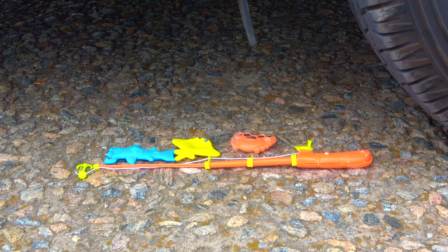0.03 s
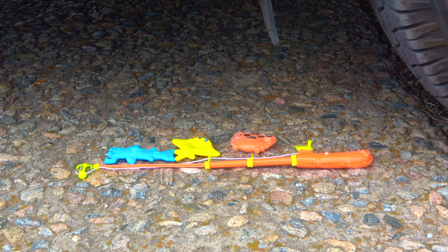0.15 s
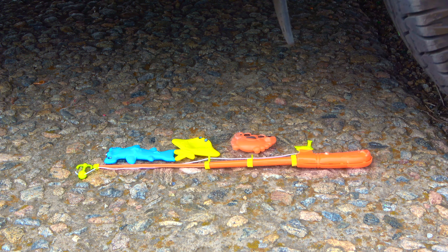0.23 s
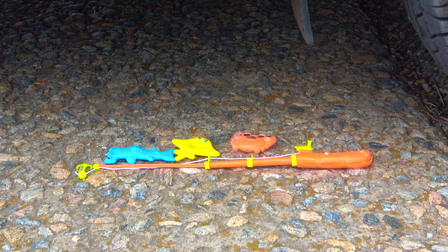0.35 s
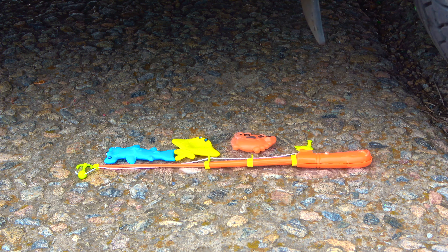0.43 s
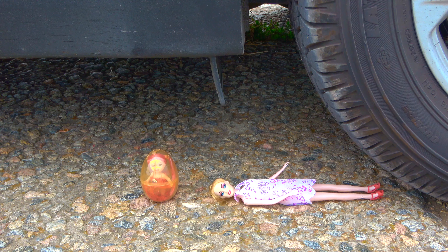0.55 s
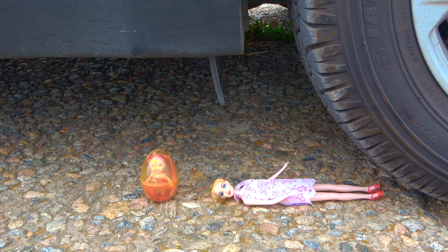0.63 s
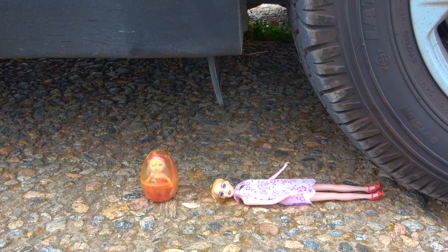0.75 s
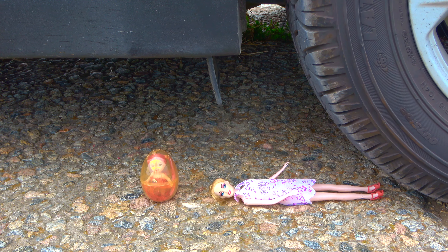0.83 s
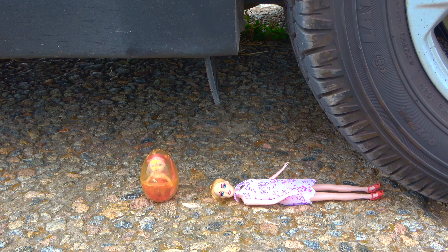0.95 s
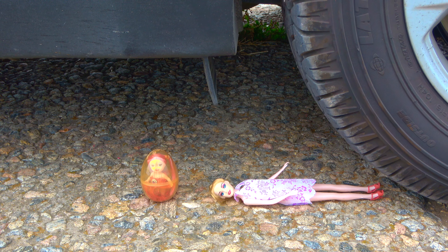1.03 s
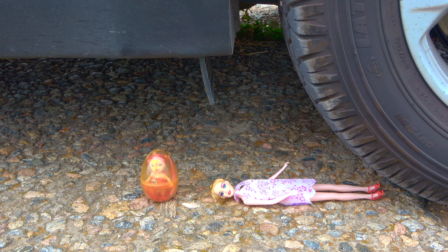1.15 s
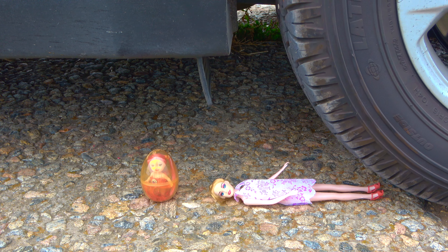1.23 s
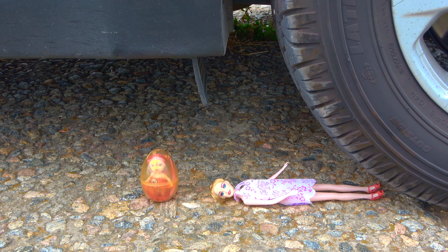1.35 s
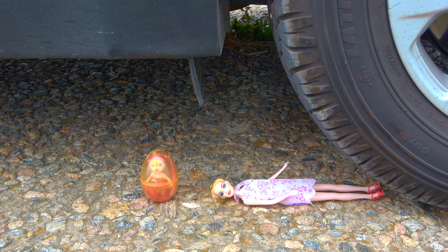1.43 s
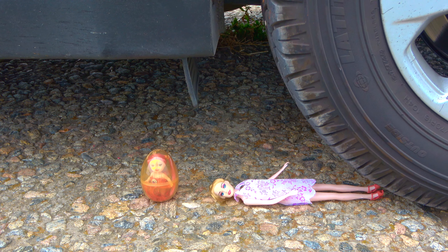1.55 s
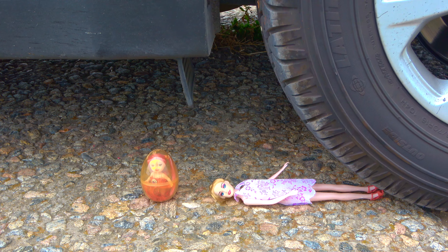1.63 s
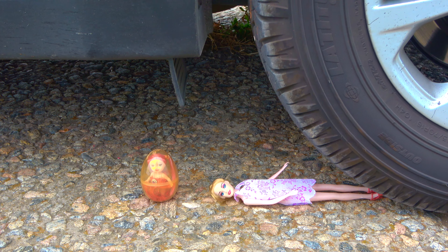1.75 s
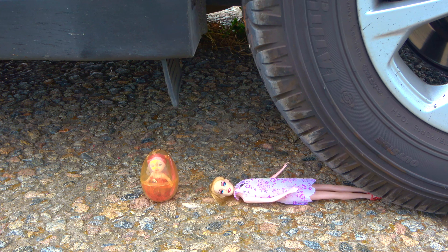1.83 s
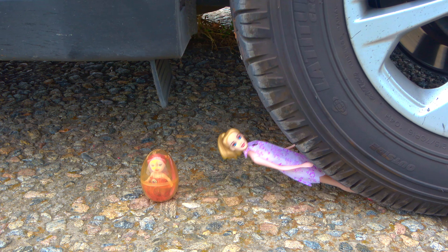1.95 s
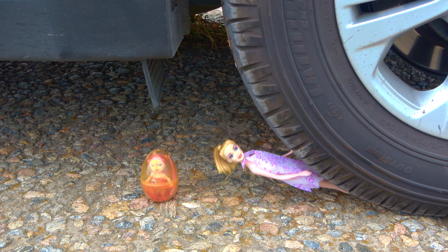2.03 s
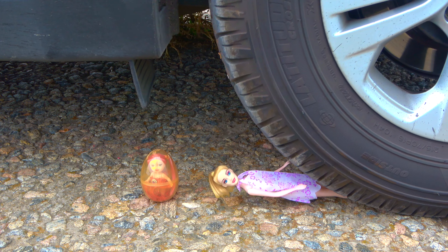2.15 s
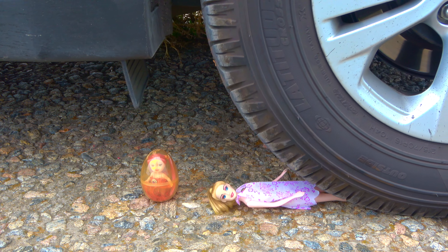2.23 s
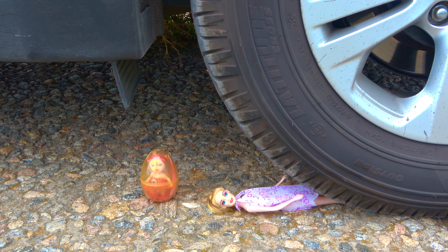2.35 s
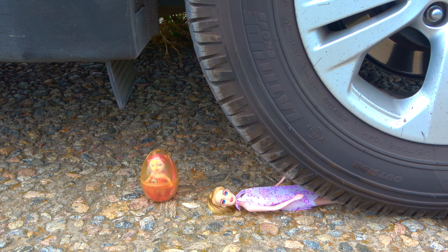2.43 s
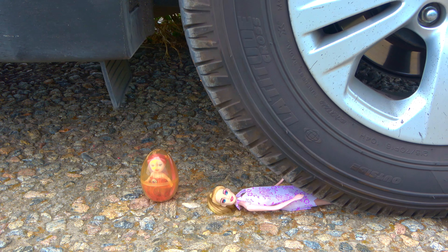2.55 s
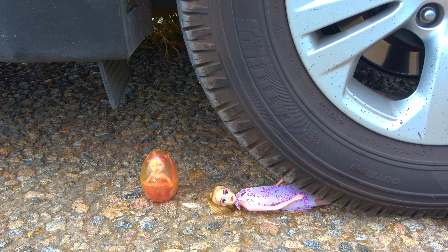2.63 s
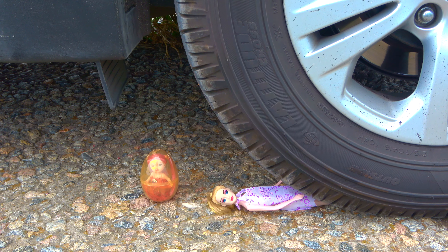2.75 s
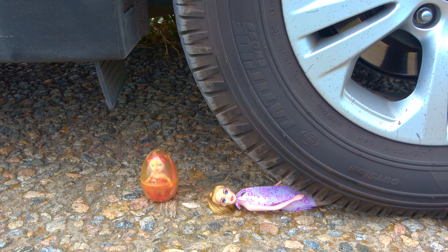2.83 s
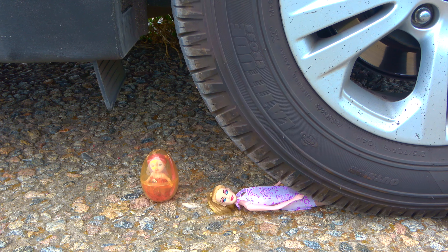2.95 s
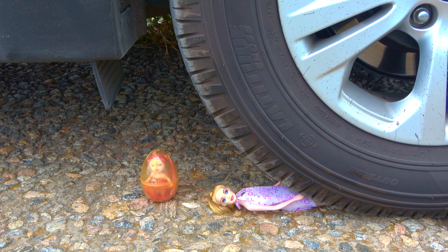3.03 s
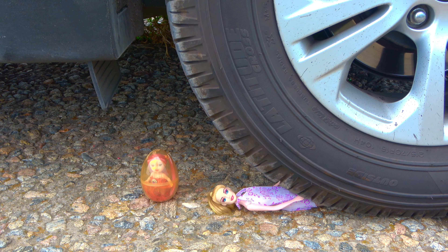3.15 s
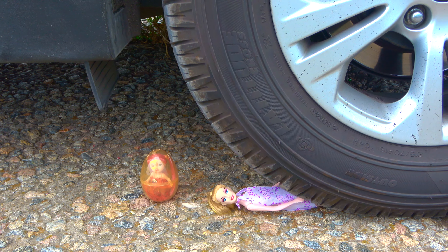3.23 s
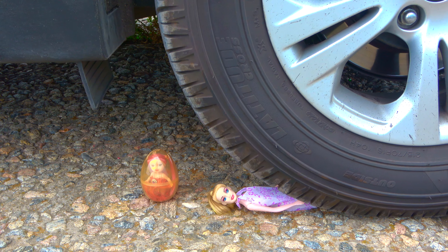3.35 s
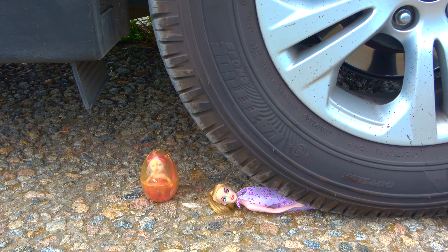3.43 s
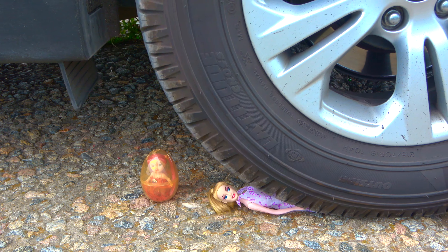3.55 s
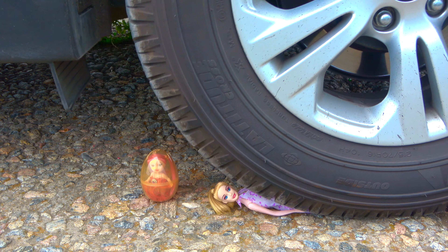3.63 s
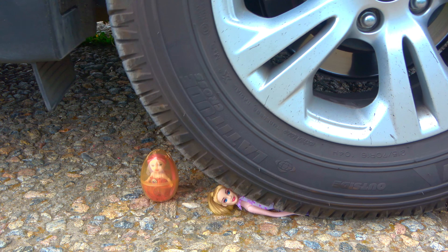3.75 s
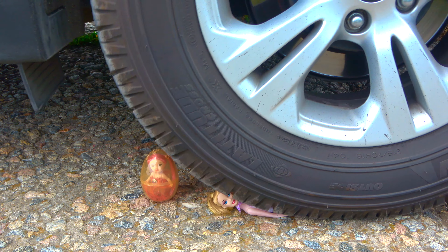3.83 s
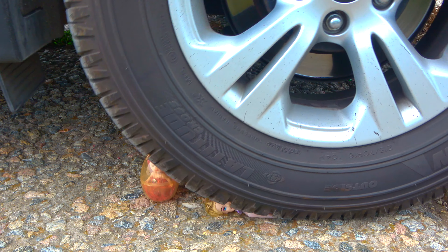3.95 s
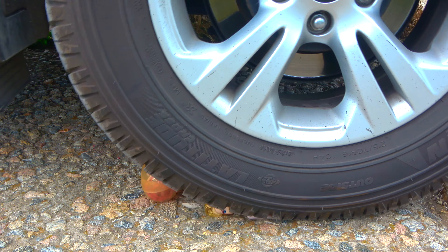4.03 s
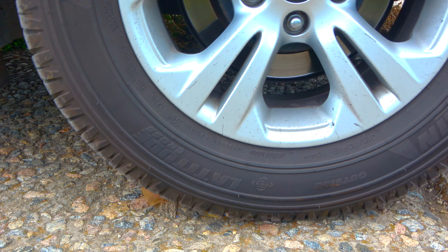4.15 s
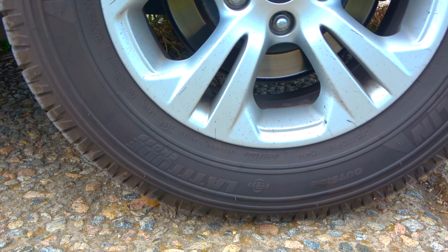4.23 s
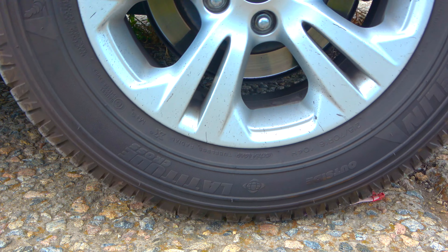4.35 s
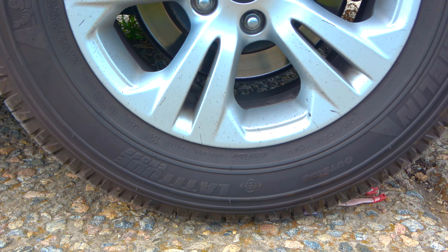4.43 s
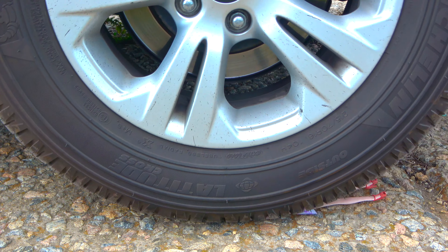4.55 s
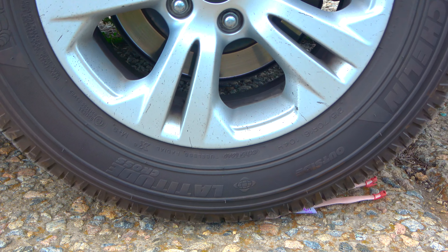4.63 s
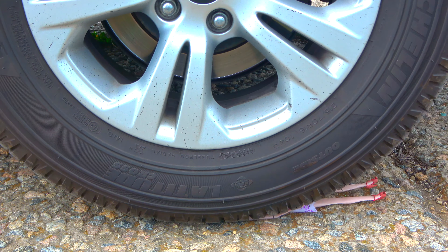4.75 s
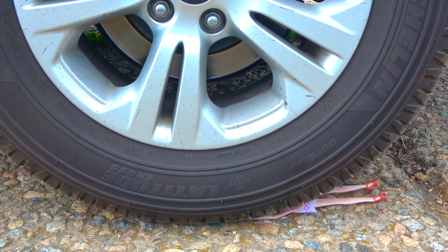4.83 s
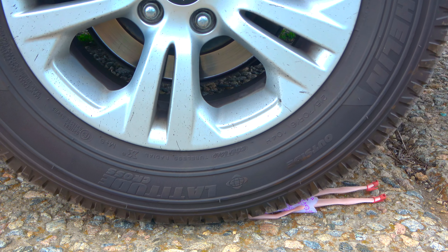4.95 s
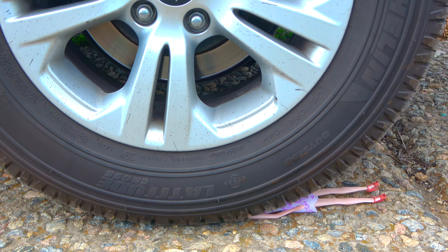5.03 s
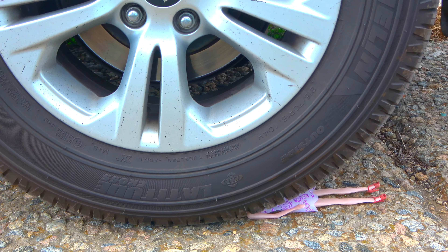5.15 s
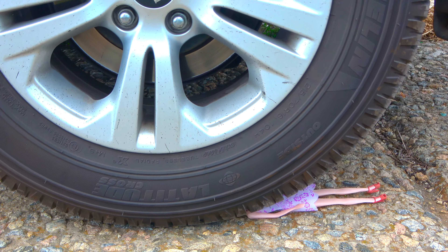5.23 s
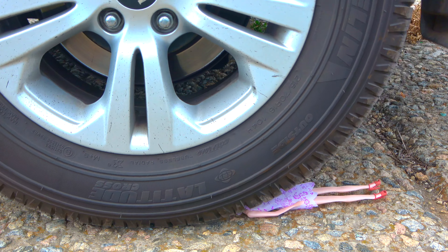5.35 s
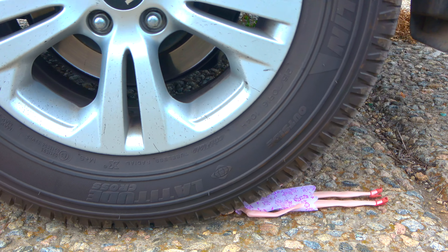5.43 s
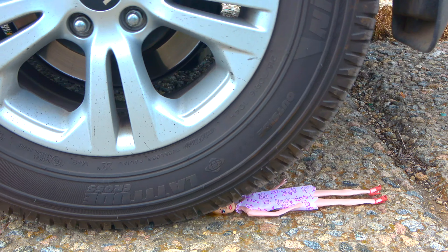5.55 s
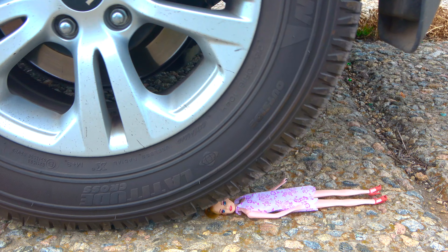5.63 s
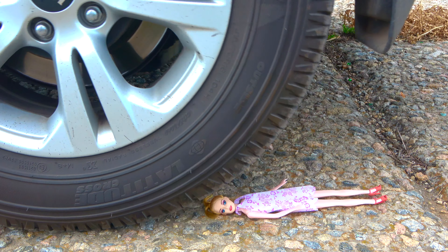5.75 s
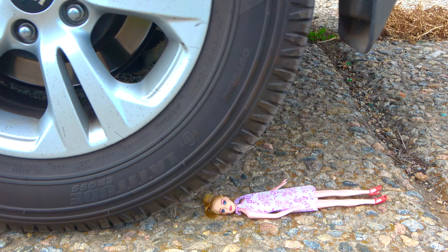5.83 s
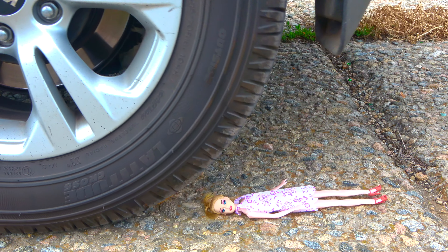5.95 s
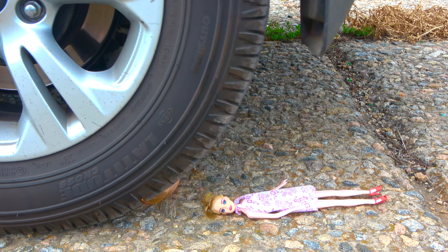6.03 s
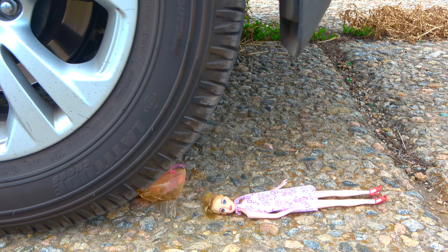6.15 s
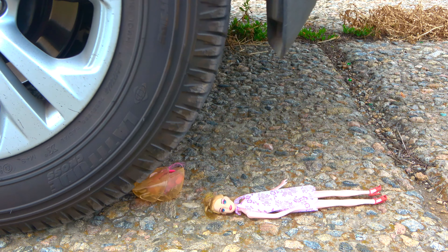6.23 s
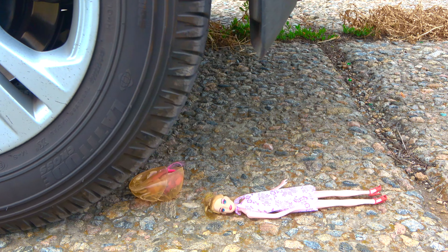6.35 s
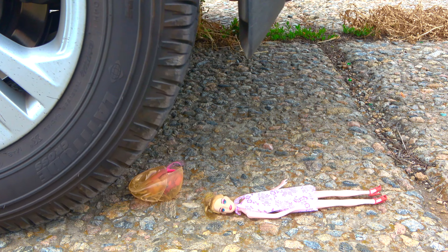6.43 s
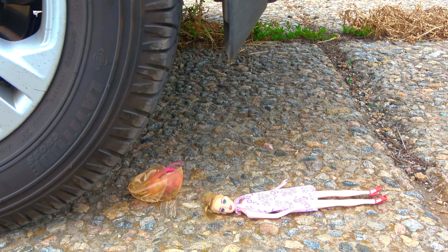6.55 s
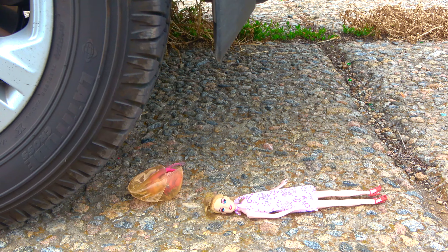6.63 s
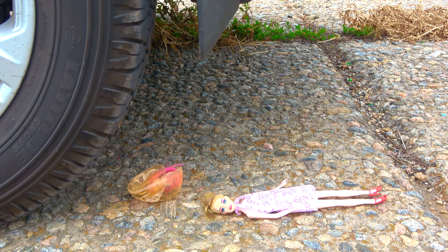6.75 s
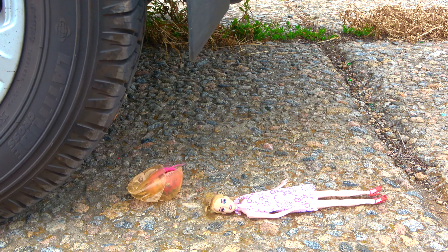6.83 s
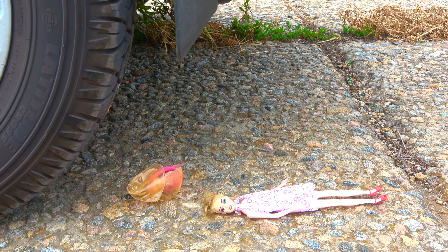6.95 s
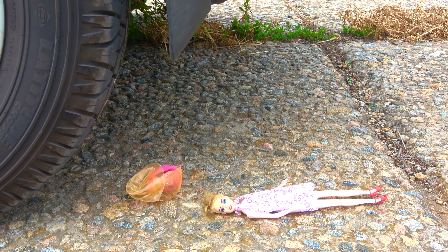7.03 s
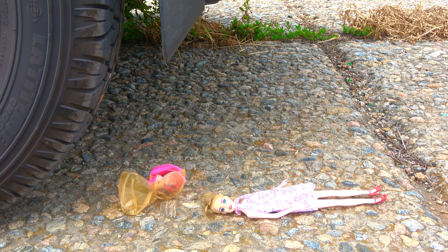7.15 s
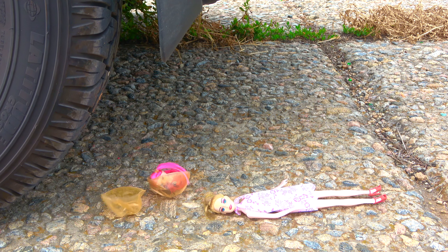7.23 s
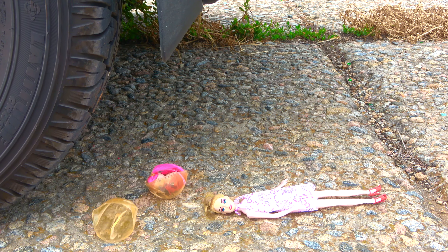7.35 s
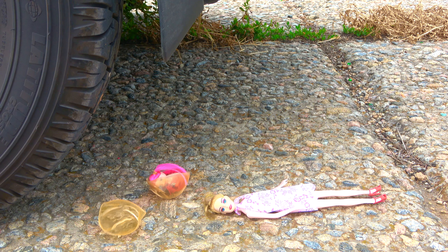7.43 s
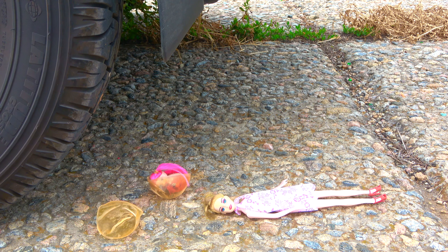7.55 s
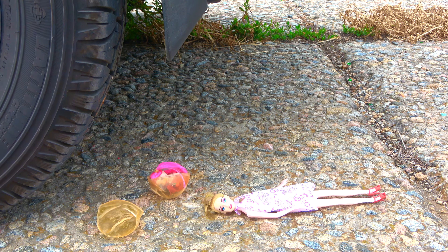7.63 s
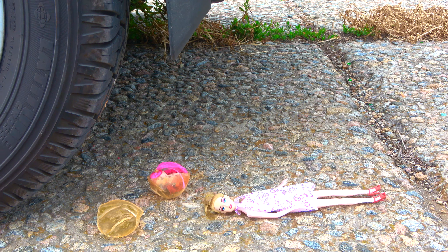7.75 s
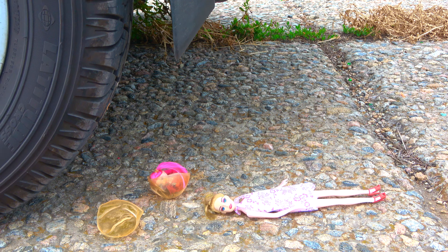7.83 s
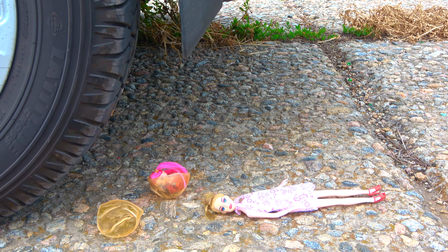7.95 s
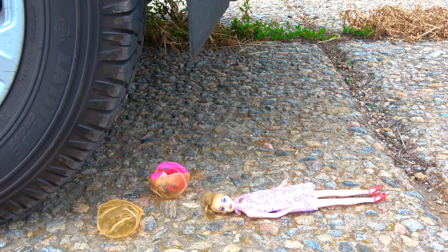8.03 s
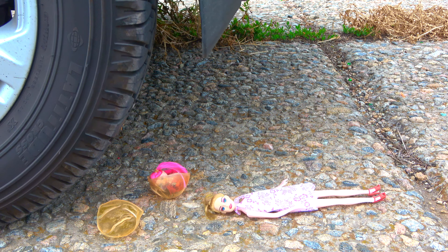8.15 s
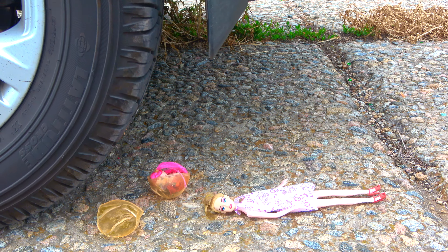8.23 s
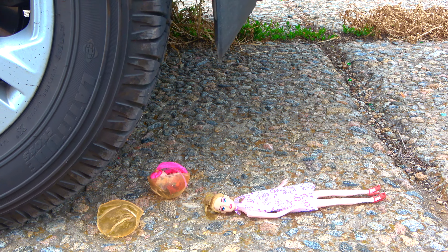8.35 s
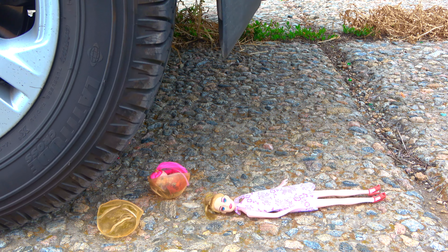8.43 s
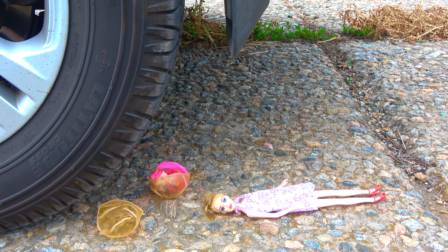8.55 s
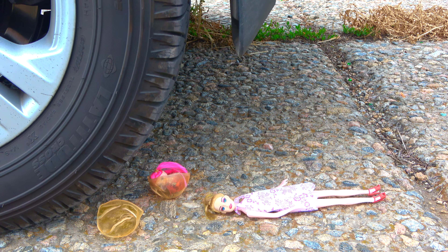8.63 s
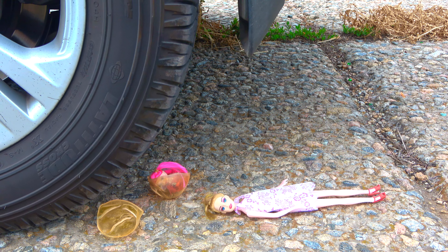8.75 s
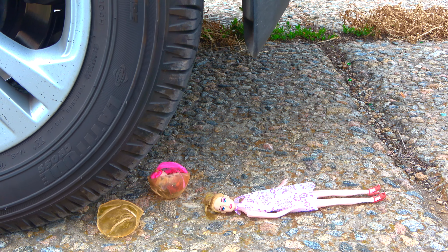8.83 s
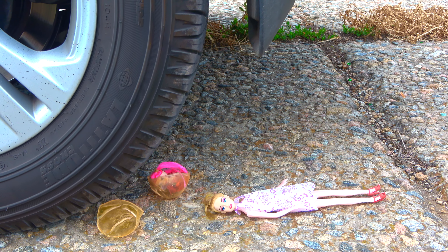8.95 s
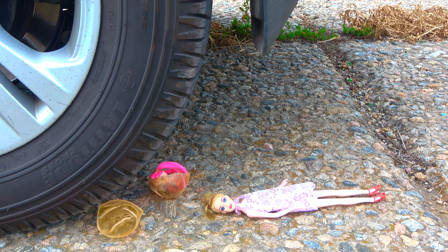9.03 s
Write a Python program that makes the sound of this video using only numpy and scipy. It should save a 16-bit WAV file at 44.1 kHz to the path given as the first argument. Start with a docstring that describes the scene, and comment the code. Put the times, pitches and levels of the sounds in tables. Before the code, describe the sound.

Close, steady engine hum with ticking valves; grit rasps, brittle plastic snaps loudly under a slow wheel, followed later by a few hollow pops.

```python
"""A four-cylinder engine idles beside the listener, with ticking valves and a humming fan: exhaust orders,
resonant bay noise and short metallic chirps. The car creeps over pebbled concrete and crushes a plastic doll
and a hollow toy egg: brief decaying tones and coloured runs of clicks crack and crunch, and shaped noise
hisses as air escapes. The freed egg then pops back into shape. Diffuse echo from the underbody scatters
the cracks, splinters and pops."""
import sys
import numpy as np
from scipy import signal
from scipy.fft import rfft, irfft, next_fast_len
from scipy.io import wavfile
from scipy.ndimage import uniform_filter1d, map_coordinates

SR = 44100
rng = np.random.default_rng(int(sys.argv[2]) if len(sys.argv) > 2 else 0)


def waveform_to_disk(signal):
    """Save audio, clipped to [-1, 1], as 16-bit WAV at the path in sys.argv[1]."""
    frames = np.transpose(np.atleast_2d(signal))
    scaled = np.clip(frames, -1, 1) * 32767
    samples = np.round(scaled).astype(np.int16)
    wavfile.write(sys.argv[1], SR, samples)


N = 400869  # samples

# Engine speed: [t/s, firing rate/Hz]
ENGINE_SPEED = [(0.0, 26), (3.09, 25.7), (3.9, 24), (4.18, 29), (4.73, 28.8), (5.09, 28.2), (7.42, 26.6),
                (7.82, 26.9), (9.09, 30.2)]
# Car at work, rolling, its engine hidden behind the wheel: [t/s, body reference level/dB, treble reference/dB]
CAR_NOISE = [(0.0, -49, -50), (0.3, -46.5, -49), (0.56, -45.5, -47), (0.65, -41, -45), (0.85, -39, -45),
             (1.4, -40, -48), (2.1, -42.5, -46), (3.1, -45.5, -47), (3.7, -43, -46), (5.0, -48, -48.5),
             (5.45, -47.5, -50), (5.75, -51.5, -55), (7.05, -51.5, -58.5), (7.27, -50.5, -54.5),
             (7.58, -54.5, -61), (7.8, -53, -58.5), (8.55, -49, -55), (9.09, -46.5, -48.5)]
CAR_REST_DB, IDLE_HZ = -47, 26.3  # body level and firing rate when the engine merely ticks over
EXHAUST_DB, EXHAUST_FOLLOWS, EXHAUST_DB_PER_HZ = -55, 0.84, 1.56  # at rest; share of car's swell; speed gain
# Exhaust harmonics: [multiple of firing rate, mean relative level/dB]
EXHAUST_ORDERS = [(2, -23), (3, 3), (4, -5), (5, -11), (6, -15.5), (7, -14)]
# Tones close to the third order, which make the hum throb: [f/Hz, mean relative level/dB]
BEAT_TONES = [(69.2, -4.5), (83, -12.5), (87, -8)]
# Lines of the cooling fan: [f/Hz, mean relative level/dB]
FAN_LINES = [(138.4, -11), (173, -24.5), (242.1, -10), (346, -15.5), (393, -11.5), (474, -12.5)]
# Spectrum of the engine bay noise: [f/Hz, relative density/(dB per Hz)]
BAY_COLOUR = [(25, -13.5), (45, -8.5), (90, -7), (150, -2.5), (300, -1.5), (420, 1), (480, 0.5), (570, 0),
              (700, -3), (1200, -2.5), (1700, -1), (1900, -8)]
# Spectrum of its clatter: [f/Hz, relative density/(dB per Hz)]
CLATTER_COLOUR = [(1900, 2.5), (2300, 1.5), (2550, -2.5), (3400, -2), (4300, -9), (5500, -11),
                  (7500, -14.5), (9400, -22.5), (11000, -29.5), (12500, -35), (16000, -31)]
# Resonances of the engine bay: [f/Hz, half width/Hz, boost/dB]
BAY_MODES = [(474.6, 16.4, 7), (958, 100, 3), (1390, 120, 4), (1594, 13, 3), (2185, 29, 3.5), (2325, 33, 6),
             (2530, 28, 6), (4170, 224, 6.5)]
LUMPS_PER_S, LUMP_DB = 13, 0.37  # the tread climbs over pebbles
# Spectrum of the injector ticks: [f/Hz, relative density/(dB per Hz)]
INJECTOR_COLOUR = [(7000, -5.5), (8200, 18.5), (8900, -6), (9400, -1), (10600, -7), (11300, -5),
                   (12300, -8), (14200, 6), (15500, -4), (16000, -17.5)]
# Centre pitches of the valve chirps: [f/Hz, relative level/dB]
VALVE_PITCHES = [(4050, -4), (4800, -2), (6110, 0.5), (7200, -1.5)]
VALVE_DB, VALVE_RANGE_DB, VALVE_SCATTER = -5, 16.5, 0.04  # trim; span of strengths; share of pitch
# The clearest valve chirps: [t/s, level before CHIRP_DB/dB, f/Hz]
CLEAR_CHIRPS = [(0.1261, -41, 6100), (0.2094, -43, 7220), (0.2788, -46, 5020), (0.4314, -35, 6160),
                (0.7731, -40.5, 7170), (0.9931, -37, 6020), (1.1463, -39, 6100), (1.4511, -36, 6060),
                (1.9106, -33, 6160), (2.0093, -40, 7350), (2.1091, -41, 7250), (2.3316, -38.5, 4700),
                (2.4548, -40, 7230), (2.6399, -43, 5900), (2.7945, -44, 4820), (2.9861, -41, 6200),
                (3.0669, -37, 7230), (3.1832, -36.5, 6170), (3.3772, -33, 7240), (3.4441, -37, 6270),
                (3.5209, -36.5, 6090), (3.6351, -36, 7250), (4.587, -36, 7270), (5.0679, -43.5, 4680),
                (5.222, -38, 6048), (5.4525, -31.5, 6120), (5.7189, -42.5, 6100), (6.2158, -41.5, 4663),
                (6.7765, -48, 4810), (7.5004, -55, 7050), (7.9568, -49.5, 4820), (8.0306, -51, 7110),
                (8.5215, -41.5, 6270), (8.8458, -38.5, 6200), (8.957, -37, 6214)]
CHIRP_DB, CHIRP_SWELL_S, CHIRP_ROUGH = -4.5, 0.0044, 0.4  # trim; time to peak; phase drift

# Runs of tiny fractures: [t/s, length/s, kind, pitch ratio, level/dB, treble gain/dB]
CRUNCHES = [(0.768, 0.15, "cavity", 0.95, -36, 0), (3.867, 0.046, "hollow", 1.08, -29.5, -6.5),
            (3.918, 0.035, "shards", 0.82, -42.5, 2), (3.969, 0.09, "buckle", 0.92, -41, -6.5),
            (4.06, 0.026, "buckle", 1.01, -29.5, -1.5), (4.141, 0.022, "flatten", 1.03, -26.5, 0),
            (4.224, 0.02, "split", 1, -26, 2.5), (4.252, 0.03, "split", 0.93, -33.5, -11),
            (4.379, 0.03, "hollow", 1.01, -28.5, -2), (4.445, 0.022, "knock", 0.92, -28, -2),
            (4.478, .003, "knock", 0.96, -25, 1), (4.527, 0.02, "knock", 0.99, -28, 2),
            (4.598, 0.096, "hollow", 0.82, -48, 11.5), (4.719, 0.045, "shards", 0.97, -29, -1),
            (4.784, .012, "shards", 0.98, -27, -3), (4.821, 0.044, "shards", 0.84, -39, -7),
            (4.857, 0.017, "snap", 1.04, -28.5, -6), (4.882, 0.0034, "snap", 0.96, -22.5, 3),
            (5.451, 0.019, "shards", 0.85, -51.5, -15), (6.171, 0.019, "hollow", 0.93, -42.5, -6.5),
            (6.247, 0.04, "hollow", 0.95, -51, -9), (7.236, 0.038, "snap", 0.87, -48, -1)]
CRUNCH_SPLIT_HZ, CRUNCH_T60_S, CRUNCH_TREBLE_T60_S = 2260, 0.16, 0.079  # the treble dies sooner
FRACTURES_PER_S, FRACTURE_SPREAD_DB, FRACTURE_BLUR = 1400, 0.5, 0.77  # rate; size spread; share of noise
# Hollow plastic body, the doll's, and the egg's after its first pop: [f/Hz, relative density/(dB per Hz)]
HOLLOW = [(210, -36), (350, -17.5), (719, -4.5), (990, -0.5), (1500, 1), (2030, -23), (2630, -12),
          (3980, -18), (4600, -30), (5060, -16), (5570, -30), (6330, -22.5), (8850, -35), (11800, -35),
          (16000, -49)]
# Doll's head caving in: [f/Hz, relative density/(dB per Hz)]
KNOCK = [(210, -24.5), (400, -14), (740, -12.5), (980, -3.5), (1550, -4.5), (1750, -1.5), (1980, -31),
         (2300, -28), (2850, -17.5), (3500, -22), (4500, -33), (5500, -24), (8000, -23.5), (11800, -34),
         (16000, -55)]
# Egg's dome caving in: [f/Hz, relative density/(dB per Hz)]
BUCKLE = [(240, -39), (400, -2), (595, -15.5), (915, 1.5), (1460, -30), (1810, -4.5), (2070, -15),
          (2160, -30), (3560, -5), (3900, -12.5), (4950, -11), (5540, -30), (6000, -21), (7800, -57),
          (13200, -120)]
# Egg's wall meeting the ground: [f/Hz, relative density/(dB per Hz)]
FLATTEN = [(150, -53), (250, -19), (629, 4), (860, -18), (1120, 0), (1310, -19), (1640, -33), (1880, -35.5),
           (2910, -25), (3840, -27), (4190, -13), (5160, -18.5), (5730, -22.5), (7700, -19), (16000, -50.5)]
# Egg's seam bursting: [f/Hz, relative density/(dB per Hz)]
SPLIT = [(210, -52.5), (350, -33), (613, -3.5), (1020, -6.5), (1240, -4), (1730, -7), (2240, 2),
         (2630, -1.5), (3620, -5.5), (6030, -21.5), (10200, -31), (14800, -50), (16000, -72)]
# Broken pieces grinding together: [f/Hz, relative density/(dB per Hz)]
SHARDS = [(240, -47), (400, -22.5), (616, -10), (789, -25), (1070, 1.5), (1290, -2.5), (1440, -13),
          (2670, 1), (3070, -3.5), (3640, -3), (4050, -11), (5270, -7.5), (7990, -19), (11000, -18),
          (16000, -39)]
# Last stiff piece giving way: [f/Hz, relative density/(dB per Hz)]
SNAP = [(150, -53), (250, -27), (597, -1.5), (845, -14), (1100, 3), (1450, -14), (1580, -10), (1730, -13),
        (2020, -7), (2250, -13), (2750, -6), (3300, -16), (3850, -32), (4750, -18), (5350, -32),
        (6100, -16), (6940, -34), (7700, -31), (16000, -49)]
# Space under the car: [f/Hz, relative density/(dB per Hz)]
CAVITY = [(250, -31), (420, -13), (490, 5), (600, -5), (900, -33), (3000, -45), (16000, -70)]
CRUNCH_COLOURS = {"hollow": HOLLOW, "knock": KNOCK, "buckle": BUCKLE, "flatten": FLATTEN,
                  "split": SPLIT, "shards": SHARDS, "snap": SNAP, "cavity": CAVITY}

# Single fractures: [t/s, shell f/Hz, level/dB, edge f/Hz, edge over shell before trim/dB, splinter gain/dB]
CRACKS = [(0.7697, 540, -16, 2370, -27, -38), (1.192, 1400, -25, 2220, -18, -30),
          (2.373, 574, -33.5, 3970, -9, 4.5), (3.7912, 1090, -13, 1780, -5.5, -36),
          (3.8644, 1440, -19, 2610, -4.5, -10), (3.8987, 1360, -13, 2410, -8.5, -12),
          (4.039, 950, -23, 1900, -17, -22.5), (4.0549, 900, -27, 1850, 5, -26),
          (4.0572, 870, -9.5, 1840, -1, -18), (4.139, 700, -17.5, 4310, -3.5, -12),
          (4.1577, 1140, -16.5, 4600, -12, -10), (4.218, 1080, -21, 5190, 13, 0),
          (4.219, 1900, -18.5, 2850, 4, -5), (4.2244, 1810, -16, 2850, 4.5, -8.5),
          (4.2725, 1900, -29, 2350, 2, -20), (4.351, 1650, -18, 2100, -10, -18),
          (4.3803, 1490, -19, 3500, -11, -19), (4.3824, 1400, -19, 3300, -12, -20),
          (4.3918, 1450, -17, 3280, -8, -16), (4.4437, 1460, -15, 3290, -10, -20),
          (4.4641, 1410, -6.5, 3620, -18, -18), (4.4786, 1320, -1, 2890, -11, -18.5),
          (4.5219, 1470, -15, 2670, 0, -20), (4.529, 1400, -17, 2600, -12, -19),
          (4.538, 1450, -16, 2600, -17, -20), (4.712, 1120, -33, 2700, 0, -9),
          (4.7168, 1120, -26, 2700, 0, -1), (4.7328, 1160, -24.5, 2800, 7, 2.5),
          (4.7416, 1160, -27, 3510, 8, 3), (4.7503, 1180, -25.5, 2700, 7.5, 11.5),
          (4.7848, 1210, -26.5, 3100, 9, 1.5), (4.7956, 1150, -26, 2600, 4, -8),
          (4.8538, 1100, -20, 2596, 1, -8), (4.885, 900, -13, 2640, 7.5, -9),
          (5.4536, 498, -28, 2280, 0, -22), (7.1558, 450, -44, 3980, 10, 3),
          (7.1971, 1550, -33.5, 4110, -1, -15), (7.2322, 880, -31.5, 2370, -4, -18),
          (7.2565, 860, -28, 2370, -2.5, -29), (7.271, 900, -38, 2400, 2, -21)]
SHELL_MODE_HZ = 970
BREAK_HZ, BREAK_S, BREAK_DB = 4200, 0.00016, -2.5  # spike of the break itself, over the splinter
SPLINTER_HZ, SPLINTER_OCTAVES = 8300, 0.71  # centre and range of the splinters' pitch
SPLINTER_RING_S, SPLINTER_RING_DB = 0.00039, -13.5  # a sliver barely rings
# Echo decay between car floor and ground: [f/Hz, t60/s]
UNDERBODY_T60 = [(200, 0.22), (1500, 0.11), (5000, 0.037), (14000, 0.075)]

# Clumps of grit ground under the tread as the car moves off: [t/s, level before GRIND_DB/dB]
GRINDS = [(0.808, -26.5), (0.89, -21.5), (0.939, -27), (0.9961, -32), (1.1232, -23.5), (1.153, -29),
          (1.1912, -31), (1.2504, -29), (1.3463, -25.5), (1.3818, -25), (1.4932, -30)]
# Spectrum of the crumbling grit: [f/Hz, relative density/(dB per Hz)]
GRIT_COLOUR = [(700, -28), (1150, -16), (1400, 8), (1560, 2), (1800, 1), (2100, -30), (6000, -32),
               (16000, -64)]
GRIND_DB, GRIND_SWELL_S = -9.5, 0.0069
# The strained doll shedding splinters: [start t/s, end t/s, splinter rate/(1/s), level before scatter/dB]
SPLINTERING = [(3.659, 3.78, 26, -31), (3.895, 4.03, 73, -54), (4.481, 4.6, 69, -39),
               (5.05, 5.3, 16, -39.5)]
# Slivers snapping off: [t/s, level before SLIVER_DB/dB, f/Hz]
SLIVERS = [(3.681, -34, 8700), (3.8427, -31, 7130), (3.8599, -25.5, 4960), (3.9147, -22, 5000),
           (3.921, -24.5, 8700), (3.9386, -23, 4960), (3.9535, -22.5, 8850), (3.982, -25.5, 4960),
           (3.9935, -28, 5000), (4.013, -26, 10050), (4.0539, -17.5, 4900), (4.35, -25.5, 8550),
           (4.559, -19.5, 7000), (4.5964, -31, 9250), (7.449, -58, 4750), (7.476, -44, 4720)]
SLIVER_DB, SLIVER_SWELL_S, SLIVER_ECHO_DB = -1.5, 0.000602, -3
# Spectrum of air escaping from the egg: [f/Hz, relative density/(dB per Hz)]
HISS_COLOUR = [(880, -37), (1500, -8), (2060, -24), (2340, -23), (2740, -6.5), (3030, -23.5), (4370, -1),
               (5120, -3), (5770, -30), (6240, -3), (7030, -12.5), (7390, -1), (10600, 1), (13900, -10.5),
               (16000, -16)]
SQUEEZE_S, SQUEEZE_DB = 4.072, -31  # the egg gives way
SQUEEZE_ATTACK_S, SQUEEZE_HOLD_S, SQUEEZE_T60_S = 0.015, 0.066, 0.08  # the hold ends this long after onset
# The tyre drops as a toy gives way and the car body booms: [t/s, boom level/dB]
THUMPS = [(4.085, -43), (4.215, -36.5), (4.34, -41), (4.43, -46), (4.64, -38)]
THUMP_HZ, THUMP_SWELL_S = 76, 0.0115
# Spectrum of the tyre's dull thud: [f/Hz, relative density/(dB per Hz)]
RUBBER_COLOUR = [(60, -12), (170, 2.5), (260, -0.5), (420, -10), (700, -24), (2000, -60)]
RUBBER_DB, RUBBER_SWELL_S = -3.5, 0.012
# The egg springing: [t/s, f/Hz, level/dB, swell/s, rim gain/dB, overtone gain/dB, echo gain/dB]
POPS = [(6.1574, 1110, -22.5, 0.0032, -15.5, -28, -7.5), (7.3643, 2221, -12.5, 0.0024, -11.5, -36, -15),
        (7.382, 2350, -17, 0.0018, -10, -10.5, -12.5), (7.516, 2223, -14, 0.0024, -39, -40, -11)]
# Overtones of the egg: [frequency ratio, relative level/dB]
EGG_OVERTONES = [(2.2, -14.5), (3.55, -10)]
POP_ECHO_TOP_HZ = 2680  # the echo of a pop is dull

# Brief dips in level: [start t/s, down t/s, rising t/s, end t/s, level/dB]
LEVEL_DIPS = [(0.581, 0.595, 0.6, 0.632, -16.5), (7.655, 7.674, 7.684, 7.708, -16.5)]
TOP_HZ = 15900  # band limit


def amp(db):
    """Twenty decibels are a factor of ten in amplitude."""
    return 10 ** (np.asarray(db) / 20)


def unit(x):
    """Equal mean power: scale to rms 1."""
    return x / np.sqrt(np.mean(x ** 2) + 1e-20)


def along(points, hz):
    """Logarithmic pitch: (f/Hz, value) points interpolated on a log axis."""
    f, v = np.transpose(points)
    return np.interp(np.log(hz + 1), np.log(f + 1), v)


def curves(rows):
    """Piecewise linear motion: one value per sample for each column after the time."""
    s, *cols = np.transpose(rows)
    return [np.interp(np.arange(N) / SR, s, c) for c in cols]


def wobble(rate):
    """Slow random modulation: a smooth curve through rate knots a second."""
    knots = rng.standard_normal(int(N * rate / SR) + 4)
    return map_coordinates(knots, [np.arange(N) * rate / SR])


def filtered(x, response):
    """Linear filtering: the spectrum of x times a response of frequency."""
    m = next_fast_len(N + SR // 4)
    return irfft(rfft(x, m) * response(np.fft.rfftfreq(m, 1 / SR)), m)[:N]


def coloured(x, points, low_hz=15, high_hz=20000):
    """Spectral shaping between steep band edges, at rms 1."""
    def response(f):
        edges = 1 / np.sqrt((1 + (low_hz / (f + 1)) ** 16) * (1 + (f / high_hz) ** 16))
        return amp(along(points, f)) * edges
    return unit(filtered(x, response))


def add(track, s, sound):
    """Superposition: mix a sound into the track at s seconds."""
    part = track[max(round(s * SR), 0):][:len(sound)]
    part += sound[:len(part)]


def swell(t, peak_s, order=1):
    """Transient envelope that rises to 1 at peak_s and dies away."""
    return (t / peak_s * np.exp(1 - t / peak_s)) ** order


def ring(t, hz, peak_s):
    """Damped resonance: a tone that swells and dies away quickly."""
    return swell(t, peak_s, order=2) * np.cos(2 * np.pi * hz * (t - peak_s))


def grains(rate, spread_db, count=N):
    """Random impulses, rate a second on average, of either sign and scattered size."""
    struck = rng.random(count) < rate / SR
    sign = rng.choice([-1, 1], count)
    return struck * sign * amp(spread_db * np.clip(rng.standard_normal(count), -2, 2))


def patchy(depth_db):
    """Nonstationary noise whose strength shifts from patch to patch in time and pitch."""
    z = signal.stft(rng.standard_normal(N), nperseg=512)[2]
    across_pitch = uniform_filter1d(rng.standard_normal(z.shape), size=3, axis=0)
    field = uniform_filter1d(across_pitch, size=5, axis=1)
    return signal.istft(z * amp(depth_db * unit(field)), nperseg=512)[1][:N]


def strokes(phase, life, rise, range_db):
    """Periodic excitation: one swelling and fading stroke per turn, most weak and a few strong."""
    size = amp(range_db * rng.random(1024) ** 2)[phase.astype(int) % 1024]
    within = phase % 1
    return size * np.exp(-within / life) * (1 - np.exp(-within / rise))


def chirp(t, hz):
    """Metallic whistle, short and slightly roughened by random phase drift."""
    drift = np.cumsum(rng.standard_normal(len(t))) / np.sqrt(SR / 1000)
    return swell(t, CHIRP_SWELL_S, order=2) * np.sin(2 * np.pi * hz * t + CHIRP_ROUGH * drift)


def fractures(colour, pitch=1):
    """Dense impulsive excitation of resonances: a quarter second of breaks and noise, at rms 1."""
    count = SR // 4
    clicks = unit(grains(FRACTURES_PER_S, FRACTURE_SPREAD_DB, count=count))
    clicks = clicks + FRACTURE_BLUR * rng.standard_normal(count)
    gain = amp(along(colour, np.fft.rfftfreq(count, 1 / SR) / pitch))
    return unit(irfft(rfft(clicks) * gain, count))


def splinter(t):
    """Small-body radiation: a flying sliver gives a bright spray and a tiny ring, pitched anew each time."""
    treble = signal.butter(2, [4000, 11000], "bandpass", fs=SR, output="sos")
    spray = signal.sosfilt(treble, rng.standard_normal(len(t))) * swell(t, 0.00045)
    hz = SPLINTER_HZ * 2 ** (SPLINTER_OCTAVES * (rng.random() - 0.5))
    return 0.9 * spray / np.abs(spray).max() + amp(SPLINTER_RING_DB) * ring(t, hz, SPLINTER_RING_S)


def underbody(x):
    """Diffuse reflection between car floor and ground: frequency-dependent decay, new for every sound."""
    hz, t, z = signal.stft(rng.standard_normal(SR // 4), SR, nperseg=256)
    decay = amp(-60 * t / along(UNDERBODY_T60, hz)[:, None])
    tail = signal.istft(z * decay, SR, nperseg=256)[1]
    late_tail = np.pad(tail / np.linalg.norm(tail), (SR // 300, 0))  # unit energy, about 3 ms late
    return signal.fftconvolve(x, late_tail)


def hum(turns):
    """Harmonic radiation and beating: exhaust orders and near tones grow with effort and speed; fan lines."""
    t = np.arange(N) / SR
    body_db, firing_hz = curves(CAR_NOISE)[0], curves(ENGINE_SPEED)[0]
    effort_db = EXHAUST_FOLLOWS * (body_db - CAR_REST_DB)
    exhaust_db = EXHAUST_DB + effort_db + EXHAUST_DB_PER_HZ * (firing_hz - IDLE_HZ)

    def tones(table):
        return sum(amp(db + 1.56 * wobble(7.4)) * np.sin(2 * np.pi * hz * t + hz / 300 * wobble(11))
                   for hz, db in table)

    exhaust = sum(amp(db + 1.33 * wobble(8.9)) * np.sin(2 * np.pi * k * turns + 0.15 * wobble(6.3))
                  for k, db in EXHAUST_ORDERS)
    return amp(exhaust_db) * (exhaust + tones(BEAT_TONES)) + amp(body_db + 0.5) * tones(FAN_LINES)


def bay(turns):
    """Cavity resonance and amplitude modulation: noise throbs with the firings, more so in higher bands."""
    body_db, clatter_db = curves(CAR_NOISE)
    rush_db = body_db + 0.079 * (body_db - CAR_REST_DB)  # the middle band swells most with effort
    lumps_db = LUMP_DB * wobble(LUMPS_PER_S)
    throb = np.cos(2 * np.pi * turns)

    def flutter():
        return 1.4 * wobble(45)

    def cavity(f):
        return amp(sum(db / (1 + ((f - hz) / width) ** 2) for hz, width, db in BAY_MODES))

    noise = filtered(patchy(depth_db=3), cavity)
    grit = filtered(unit(grains(120, spread_db=2.5)), cavity)  # sand crushed by the tread
    drone = coloured(noise, BAY_COLOUR, high_hz=660)
    drone = drone * amp(body_db - 1.02 + 1.1 * throb + 0.5 * flutter() + lumps_db)
    rush = coloured(noise + 0.33 * grit, BAY_COLOUR, low_hz=675, high_hz=1736)
    rush = rush * amp(rush_db - 2.5 + 1.26 * throb + flutter() + lumps_db)
    clatter = coloured(noise + 0.06 * grit, CLATTER_COLOUR, low_hz=1895)
    clatter = clatter * amp(clatter_db - 2.5 + 2.06 * throb + flutter())
    return drone + rush + clatter


def ticking(turns):
    """Periodic impacts: injectors tick per firing, valves chirp twice as often, a few of them clearly."""
    clatter_db, t = curves(CAR_NOISE)[1], np.arange(SR // 30) / SR
    jets = coloured(rng.standard_normal(N), INJECTOR_COLOUR, low_hz=7000)
    out = amp(clatter_db - 26.5) * unit(jets * strokes(turns, life=0.12, rise=0.1, range_db=30))
    beats = np.flatnonzero(np.diff(np.floor(2 * turns)))
    for i, (which, size, bend) in zip(beats, rng.random((len(beats), 3))):
        hz, db = VALVE_PITCHES[int(which * len(VALVE_PITCHES))]
        shielded_db = 0.78 * clatter_db[i]  # the wheel shields the valves less than the clatter
        level_db = VALVE_DB + db + shielded_db + VALVE_RANGE_DB * (size ** 2 - 1)
        add(out, i / SR, amp(level_db) * chirp(t, hz * (1 + VALVE_SCATTER * (2 * bend - 1))))
    for s, db, hz in CLEAR_CHIRPS:
        add(out, s, amp(db + CHIRP_DB) * chirp(t, hz))
    return out


def crunch():
    """Cascaded fracture: runs of tiny breaks start abruptly, ring the breaking part and die away."""
    out, t = np.zeros(N), np.arange(SR // 4) / SR
    lowpass = signal.butter(4, CRUNCH_SPLIT_HZ, fs=SR, output="sos")
    for start, length, kind, pitch, db, treble_db in CRUNCHES:
        after = np.maximum(t - length, 0)
        fade = amp(-60 * after / CRUNCH_T60_S)
        treble_fade = amp(-60 * after / CRUNCH_TREBLE_T60_S)
        run = fractures(CRUNCH_COLOURS[kind], pitch)
        run = run / np.sqrt(np.average(run ** 2, weights=fade ** 2))
        low = signal.sosfiltfilt(lowpass, run)
        add(out, start, amp(db) * (low * fade + amp(treble_db) * (run - low) * treble_fade))
    return out


def cracks():
    """Impulse response of a shell: a sharp spike rings shell and broken edge and throws off a splinter."""
    out, t = np.zeros(N), np.arange(SR // 40) / SR
    for s, shell_hz, db, edge_hz, edge_db, splinter_db in CRACKS:
        struck_patch = 0.61 * ring(t, shell_hz, 0.000992)
        whole_shell = 0.19 * ring(t, SHELL_MODE_HZ, 0.00093)
        edge = amp(edge_db - 4) * ring(t, edge_hz, 0.00066)
        spike = splinter(t) + amp(BREAK_DB) * ring(t, BREAK_HZ, BREAK_S)
        snap = amp(db) * (struck_patch + whole_shell + edge + amp(splinter_db) * spike)
        add(out, s, snap)
        add(out, s, amp(-9) * underbody(snap))
    return out


def grinding():
    """Granular crushing: each clump of grit crumbles in a short rasp."""
    out, t = np.zeros(N), np.arange(SR // 4) / SR
    for s, db in GRINDS:
        add(out, s, amp(db + GRIND_DB) * swell(t, GRIND_SWELL_S) * fractures(GRIT_COLOUR))
    return out


def splintering():
    """Stress release: small splinters snap off at uneven intervals while the doll is pressed."""
    out, t = np.zeros(N), np.arange(SR // 40) / SR
    for start, end, rate, db in SPLINTERING:
        for k, (late, size) in enumerate(rng.random((round((end - start) * rate), 2))):
            s = start + (k + late) / rate
            click = amp(db + 9.3 * (size - 1.5)) * (splinter(t) + 0.5 * ring(t, 4400, 0.00073))
            add(out, s, click)
            add(out, s, amp(2.0) * underbody(click))
    return out


def slivers():
    """Free vibration of a fragment: each sliver pings at its own pitch under a bright spray."""
    out, t = np.zeros(N), np.arange(SR // 40) / SR
    for s, db, hz in SLIVERS:
        ping = amp(db + SLIVER_DB) * (0.69 * ring(t, hz, SLIVER_SWELL_S) + 0.61 * splinter(t))
        add(out, s, ping)
        add(out, s, amp(SLIVER_ECHO_DB) * underbody(ping))
    return out


def squeeze():
    """Turbulent outflow: air leaves the flattened egg with a quick rise, a short hold and a fade."""
    t = np.arange(N) / SR - SQUEEZE_S
    fade = amp(-60 * np.maximum(t - SQUEEZE_HOLD_S, 0) / SQUEEZE_T60_S)
    envelope = np.clip(t / SQUEEZE_ATTACK_S, 0, 1) * fade
    return amp(SQUEEZE_DB) * envelope * coloured(rng.standard_normal(N), HISS_COLOUR)


def thumps():
    """Impact on a sprung mass: each tyre drop gives a dull rubber thud and a few cycles of body boom."""
    out, t = np.zeros(N), np.arange(SR // 4) / SR
    for s, db in THUMPS:
        thud = amp(RUBBER_DB) * swell(t, RUBBER_SWELL_S) * fractures(RUBBER_COLOUR)
        add(out, s, amp(db) * (ring(t, THUMP_HZ, THUMP_SWELL_S) + thud))
    return out


def pops():
    """Snap-through buckling: the egg wall flips with a pitched click, its rim answers higher, echo follows."""
    out, t = np.zeros(N), np.arange(SR // 40) / SR
    dull = signal.butter(6, POP_ECHO_TOP_HZ, fs=SR, output="sos")
    for s, hz, db, swell_s, rim_db, overtone_db, echo_db in POPS:
        upper = sum(amp(level + overtone_db) * np.sin(2 * np.pi * hz * ratio * t)
                    for ratio, level in EGG_OVERTONES)
        wall = swell(t, swell_s, order=6) * (np.sin(2 * np.pi * hz * t) + upper)
        rim = amp(rim_db) * swell(t, swell_s, order=8) * np.sin(2 * np.pi * 1.3 * hz * t)
        jolt = ring(t, 0.96 * hz, 1.3 / hz) + 0.5 * rim
        echo = signal.sosfilt(dull, underbody(jolt))
        add(out, s, amp(db) * (wall + rim))
        add(out, s + swell_s, amp(db + echo_db) * echo)
    return out


def scene():
    """Superposition of the idling car and the toys under its wheel."""
    turns = np.cumsum(curves(ENGINE_SPEED)[0]) / SR  # firings so far
    car = hum(turns) + bay(turns) + ticking(turns)
    breaking = crunch() + cracks() + grinding() + splintering() + slivers()
    return (car + breaking + squeeze() + thumps() + pops())[None]


def record(dry):
    """Gain and band limitation: the level dips briefly twice; nothing passes above the band limit."""
    t = np.arange(N) / SR
    dip_db = sum(np.interp(t, [start, down, rising, end], [0, db, db, 0])
                 for start, down, rising, end, db in LEVEL_DIPS)
    return filtered(dry[0] * amp(dip_db), lambda hz: hz < TOP_HZ)[None]


dry = scene()
out = record(dry)
waveform_to_disk(out)
```